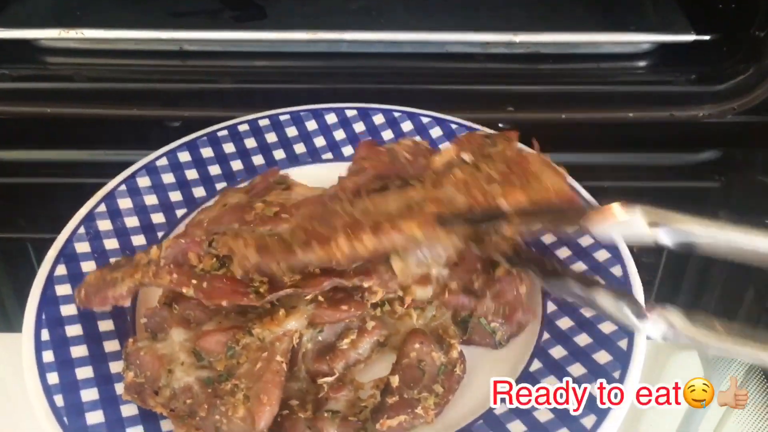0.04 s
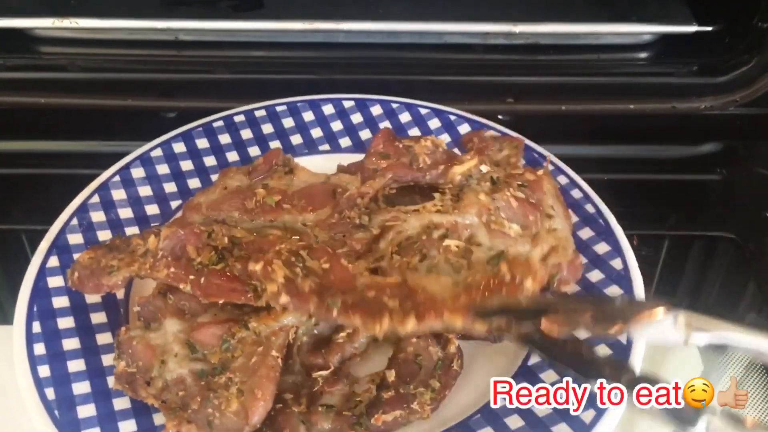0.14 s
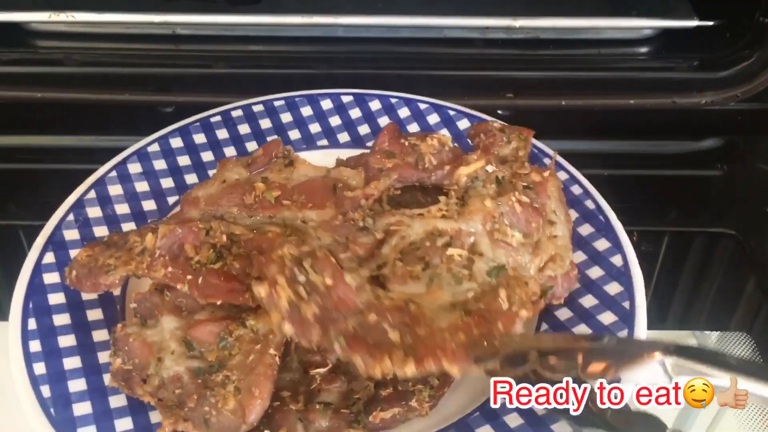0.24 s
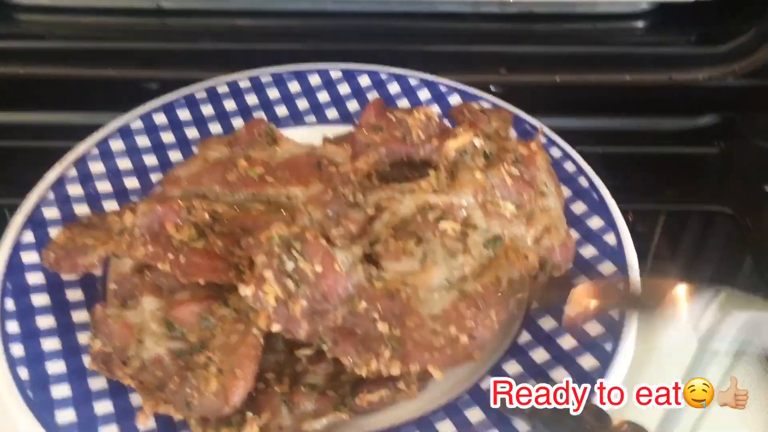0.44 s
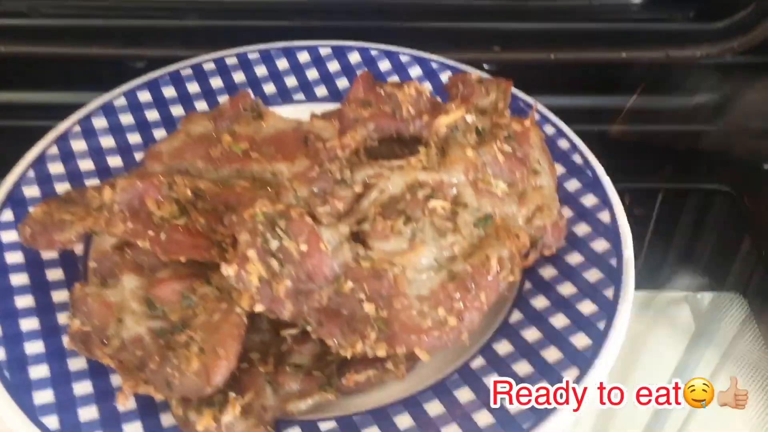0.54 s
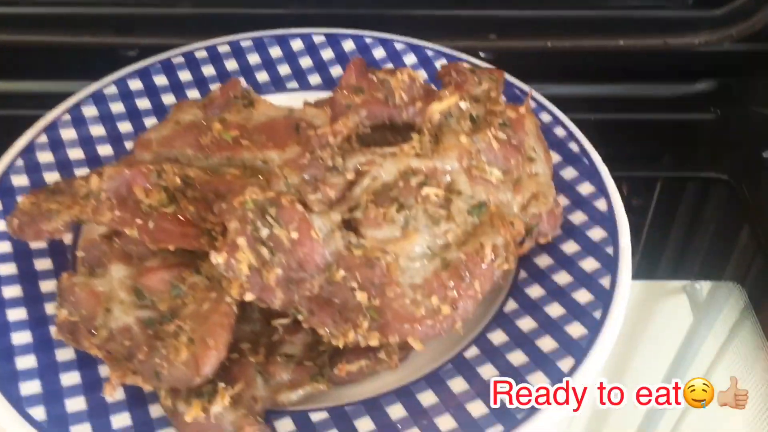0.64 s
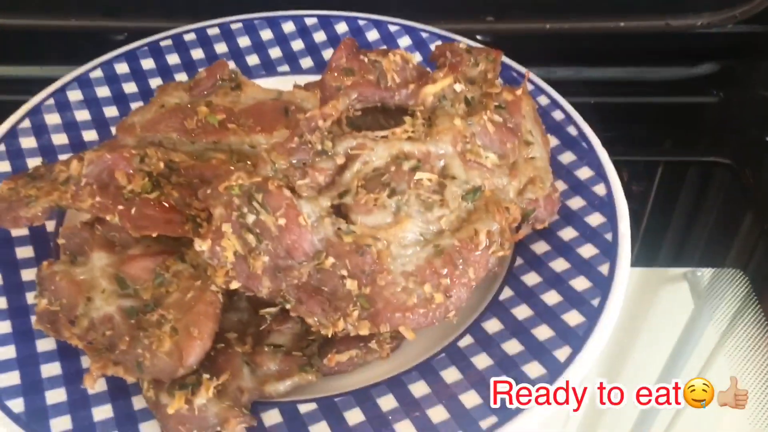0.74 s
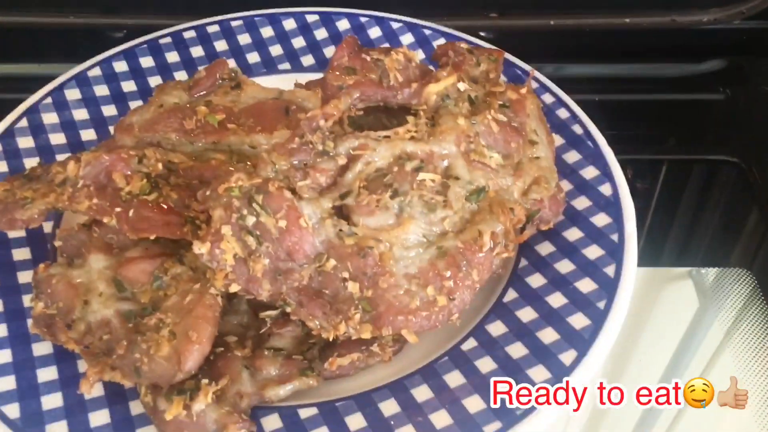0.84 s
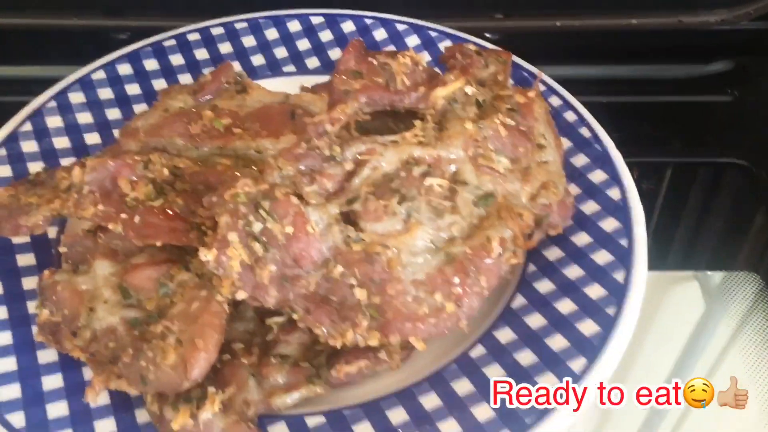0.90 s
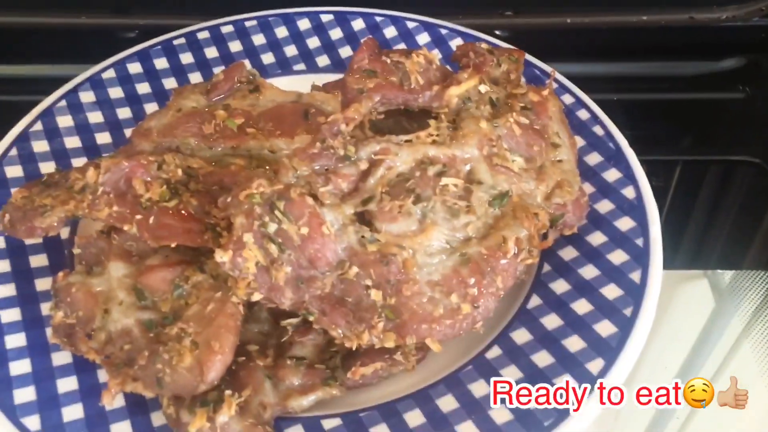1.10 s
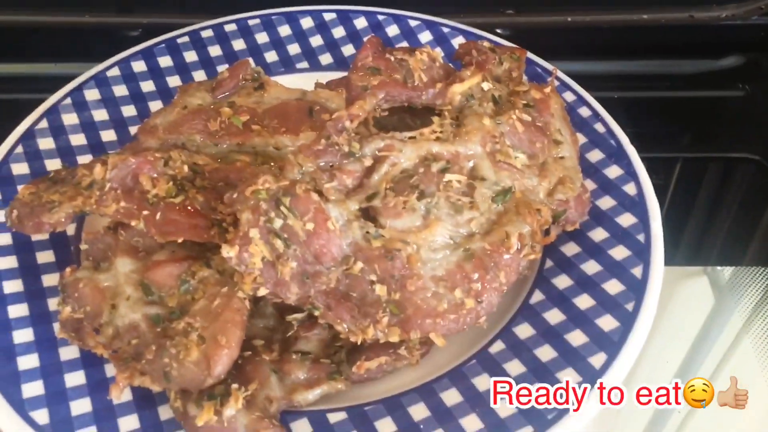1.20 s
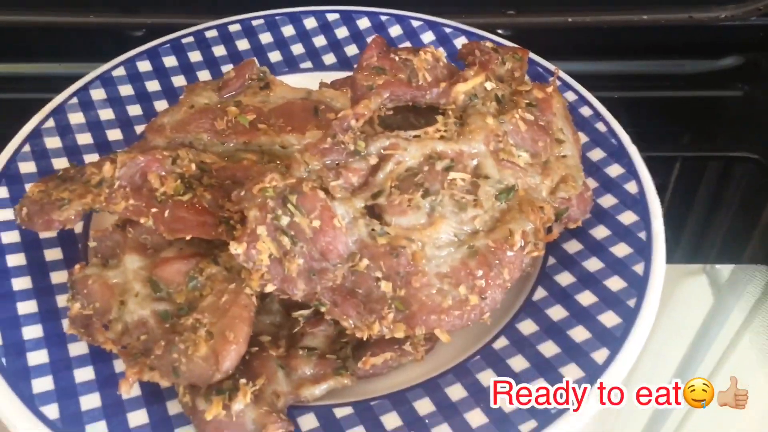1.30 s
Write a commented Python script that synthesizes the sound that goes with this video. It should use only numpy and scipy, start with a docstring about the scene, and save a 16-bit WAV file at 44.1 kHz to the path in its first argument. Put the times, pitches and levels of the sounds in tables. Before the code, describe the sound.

Metal tongs snap with two bright clacks, knock a plate, then tick faintly above a fan's rumble

```python
"""A fan rumbles and hums low throughout in a small kitchen, where steel tongs let go of meat on a china plate.
Their tips scrape, clack twice and rattle, and the plate is knocked; later come light ticks as they are drawn away.
The fan is shaped noise plus wavering tones; scrapes, rattles and ticks are shaped bursts of noise.
Tongs and plate also ring as sets of fading sines, and the kitchen adds a fading echo of noise."""
import sys
import numpy as np
from scipy import signal
from scipy.fft import irfft
from scipy.io import wavfile

SR = 44100
rng = np.random.default_rng(int(sys.argv[2]) if len(sys.argv) > 2 else 0)


def wav_out(sig):
    """Save sig, one row per channel (or a flat mono array), as 16-bit PCM at SR to the path in sys.argv[1]."""
    wavfile.write(sys.argv[1], SR, np.round(np.clip(np.atleast_2d(sig).T, -1, 1) * 32767).astype(np.int16))


N = 59535
T = np.arange(N) / SR  # the time of every sample, in seconds


def from_db(db):
    """Turn decibels into a gain."""
    return 10 ** (np.asarray(db) / 20)


def rms_one(x):
    """Scale a signal to an rms level of 1."""
    return x / np.sqrt(np.mean(x ** 2) + 1e-20)


def at_hz(points, hz):
    """Read a table between its points, with frequency on a log axis as we hear pitch."""
    f, value = np.transpose(points)
    return np.interp(np.log(np.maximum(hz, 1)), np.log(f), value)


def noise(spectrum, focus_hz=1, focus_db=0):
    """Coloured noise of rms 1: set levels with random phases, and an optional broad hump."""
    focus_width_hz = 900
    hz = np.arange(N // 2 + 1) * SR / N
    hump = np.exp(-.5 * ((hz - focus_hz) / focus_width_hz) ** 2)
    level = from_db(at_hz(spectrum, hz) + focus_db * hump)
    phases = np.exp(2j * np.pi * rng.random(len(hz)))
    return rms_one(irfft(level * phases, N))


def drift(rate_hz):
    """Smooth random wander of spread 1: white noise through two equal smoothers."""
    r = np.exp(-2 * np.pi * rate_hz / SR)
    white = rng.standard_normal(2 * N)
    smooth = signal.lfilter([1], [1, -2 * r, r * r], white)
    return rms_one(smooth[N:])  # drop the filter's start


def click(s):
    """A single click of height 1 at time s."""
    return (np.arange(N) == int(s * SR)) + 1e-18  # the tiny offset avoids vanishingly small numbers


def ring(clicks, hz, t60):
    """A resonance: each unit click starts a sine that falls 60 dB in t60 seconds."""
    r = from_db(-60 / (t60 * SR))
    w = 2 * np.pi * hz / SR
    return signal.lfilter([0, np.sin(w)], [1, -2 * r * np.cos(w), r * r], clicks)


def struck(modes, times, levels_db):
    """A solid body rings at its own pitches, each blow exciting them a little differently."""
    mode_spread_db = 2
    spread = mode_spread_db * rng.standard_normal((len(times), len(modes)))
    gains = from_db(levels_db[:, None] + spread)
    out = np.zeros(N)
    for k, (hz, db, t60) in enumerate(modes):
        clicks = np.zeros(N) + 1e-18
        clicks[(times * SR).astype(int)] = gains[:, k]
        sign = (-1) ** k  # neighbouring modes start in opposite directions
        out += sign * from_db(db) * ring(clicks, hz, t60)
    return out


def burst(s, db, t60):
    """Loudness shape of a contact's chatter: quick rise, grainy fall."""
    rise_s, grain_db, grain_hz = 0.00052, 2, 786
    age = np.maximum(T - s, 0)
    rise = 1 - np.exp(-age / rise_s)
    fall = from_db(-60 * age / t60)
    grain = rms_one(from_db(grain_db * drift(grain_hz)))
    return from_db(db) * rise * fall * grain


# Colour of the fan and room air: f/Hz, relative level/dB (per Hz)
FAN_COLOUR = [(25, -40.5), (38, -24), (52, -9), (72, -12), (102, -0.5), (135, 0), (165, -7.5), (240, -15),
              (310, -20), (470, -30.5), (800, -31), (1400, -36), (2200, -35.5), (3600, -46), (7500, -42.5),
              (9800, -43), (10300, -63), (10700, -77.5)]
# Motor tones before the rumble's swell: f/Hz, level/dB (rms)
MOTOR_TONES = [(100, -52.5), (119, -56), (191, -62), (237, -71), (301, -62), (394, -77), (797, -83),
               (1278, -79.5)]
# Level change of the deep rumble: t/s, level/dB
DEEP_SWELL = [(0.0, -1), (0.45, -1.5), (0.72, 0), (0.86, 3), (1.0, -1.5), (1.35, -0.5)]


def fan():
    """Air noise and motor tones of wavering strength and phase; the deep rumble swells a little."""
    air_db, rumble_top_hz = -47.5, 165.2
    waver_depth, waver_hz = 0.47, 6.8
    out = from_db(air_db) * noise(FAN_COLOUR)
    for hz, db in MOTOR_TONES:
        waver = 1 + waver_depth * (drift(waver_hz) + 1j * drift(waver_hz))
        turning = np.exp(2j * np.pi * (hz * T + rng.random()))
        out += from_db(db) * rms_one(np.real(waver * turning))
    low_pass = signal.butter(2, rumble_top_hz, fs=SR, output="sos")
    deep = signal.sosfiltfilt(low_pass, out)
    swell = from_db(np.interp(T, *np.transpose(DEEP_SWELL)))
    return out + deep * (swell - 1)


# Tips drag and slide off the meat: t/s, level/dB
SLIDE = [(0.0, -62.5), (0.07, -73.5), (0.165, -65), (0.186, -56.5), (0.199, -48.5), (0.213, -56)]
# Colour of steel tips rubbing and rattling, also used by tongs(): f/Hz, relative level/dB (per Hz)
TIP_COLOUR = [(200, -34), (380, -12), (520, -18), (700, -17.5), (1400, -26), (2200, -14.5), (3500, -9),
              (5000, -6.5), (6500, -2.5), (8500, -3.5), (9700, -9), (10200, -20), (10900, -40)]


def scrape():
    """The tips slide with an uneven grip, heard as grainy noise, until they snap together."""
    s, db = np.transpose(SLIDE)
    level = from_db(np.interp(T, s, db)) * (T < s[-1])
    grip = from_db(3 * drift(rate_hz=300))  # a spread of 3 dB
    return level * rms_one(grip * noise(TIP_COLOUR))


def tick(s, db, hz):
    """The hard first touch of steel: three resonances in a row give a bright pulse a few cycles long."""
    resonance_width_hz = 2160  # of each one alone
    t60 = np.log(1000) / (np.pi * resonance_width_hz)
    pulse = click(s)
    for _ in range(3):
        pulse = ring(pulse, hz, t60)
    return from_db(db) * pulse / np.abs(pulse).max()


# Contacts of the tips: t/s, tick level/dB, tick centre f/Hz, rattle level/dB, rattle t60/s,
# arms' ring level/dB
TIP_CONTACTS = [ (0.029, -57.5, 8200, -53.5, 0.041, -56), (0.1468, -46.5, 7800, -53.5, 0.023, -52),
                (0.1770, -37.5, 5600, -51.5, 0.038, -41), (0.2139, -7.5, 7624, -15.5, 0.03, -6),
                (0.2514, -33, 6840, -30, 0.019, -22), (0.2631, -12.5, 7680, -22.5, 0.088, -10),
                (0.2812, -30, 7380, -34, 0.054, -21), (0.3022, -22, 6040, -32, 0.027, -22),
                (0.344, -39, 6300, -40, .05, -27.5)]
# Ringing pitches of the steel arms: f/Hz, relative level/dB, t60/s (time to fall 60 dB)
ARM_MODES = [(349.4, -37.5, 0.142), (408.1, -29, .11), (448.8, -42.5, .16), (925, -45, .1),
             (1034, -35.5, 0.11), (2038, -37.5, 0.1), (2763, -34.5, 0.078), (2930, -42.5, 0.046),
             (3655, -32.5, 0.11), (3760, -39, 0.23), (4290, -32.5, .05), (6120, -32, .12), (6630, -26, .06),
             (6854, -38.5, .11), (7130, -22.5, 0.022), (7800, -30, .04), (7820, -32, 0.085),
             (8700, -13, 0.031), (9180, -28, 0.14), (9550, -16, 0.045)]


def tongs():
    """Every contact ticks, rattles as noise around the tick's pitch, and rings the arms."""
    times, *_, arms_db = np.transpose(TIP_CONTACTS)
    out = struck(ARM_MODES, times, arms_db)
    for s, tick_db, hz, rattle_db, t60, _ in TIP_CONTACTS:
        rattle = burst(s, rattle_db, t60) * noise(TIP_COLOUR, hz, focus_db=5)
        out += tick(s, tick_db, hz) + rattle
    return out


# The plate is knocked: t/s, relative level/dB
PLATE_KNOCKS = [(0.2835, -16), (0.3023, -9.5)]
# Ringing pitches of the loaded plate: f/Hz, relative level/dB, t60/s
CHINA_MODES = [(1358, -36.5, 0.053), (1398, -39, 0.11), (1565, -40.5, 0.023), (2013, -36, 0.091),
               (3350, -44.5, 0.12), (4280, -43, 0.11)]
# Colour of the rough contact noise: f/Hz, relative level/dB (per Hz)
CLANK_COLOUR = [(600, -38), (1100, -1), (1400, 2), (2000, 2), (2500, -8.5), (3300, 6.5), (5000, -12),
                (9000, -33)]


def plate():
    """A short noisy clank and ringing china, damped by the meat."""
    clank_db, clank_t60_s = -36.5, 0.085  # the level is added to each knock's
    shape = sum(burst(s, db + clank_db, clank_t60_s) for s, db in PLATE_KNOCKS)
    clank = shape * noise(CLANK_COLOUR)
    return clank + struck(CHINA_MODES, *np.transpose(PLATE_KNOCKS))


# The hinge ticks as the tongs are drawn away: t/s, level/dB, t60/s
HINGE_SLIPS = [(0.613, -57, 0.033), (1.06, -59.5, 0.048), (1.0910, -55.5, 0.029), (1.2469, -47, 0.031),
               (1.2589, -45.5, 0.06)]
# Colour of the hinge: f/Hz, relative level/dB (per Hz)
HINGE_COLOUR = [(1500, -35), (2400, -17.5), (2850, -3.5), (3400, -10), (4400, -6.5), (5100, -8),
                (5900, 3.5), (6700, -2), (7400, -9), (8200, -2.5), (9700, -8.5), (10500, -41)]


def hinge():
    """Small dry slips of steel on steel, made as short bursts of noise."""
    return sum(burst(*row) for row in HINGE_SLIPS) * noise(HINGE_COLOUR)


# How long the room's echo takes to fall 60 dB: f/Hz, t60/s
ECHO_T60 = [(300, .6), (1200, 0.38), (4000, 0.49), (9000, 0.38)]
# Reverberation against the direct sound: f/Hz, level/dB
ECHO_LEVEL = [(300, -0.5), (1200, -3.5), (4000, -8), (9000, -15.5)]


def kitchen(x):
    """Echo scattered from all sides: fading noise, each octave with its own level and decay."""
    delay_s = 0.0039
    edges = np.geomspace(180, 11520, 7)  # octave borders in Hz
    response = np.zeros(N)
    for low, high in zip(edges, edges[1:]):
        hz = np.sqrt(low * high)
        fall = from_db(-60 * T / at_hz(ECHO_T60, hz)) * (T > delay_s)
        tail = rms_one(rng.standard_normal(N) * fall) / np.sqrt(N)  # total energy 1
        octave = signal.butter(2, [low, high], "band", fs=SR, output="sos")
        response += from_db(at_hz(ECHO_LEVEL, hz)) * signal.sosfilt(octave, tail)
    return signal.fftconvolve(x, response)[:N]


def scene():
    """Tongs and plate, direct and echoed by the kitchen, over the fan."""
    air = fan()
    near = tongs() + plate() + hinge() + scrape()
    return (near + kitchen(near) + air)[None]


def record(dry):
    """A steep low-pass filter cuts the top of the treble."""
    cutoff_hz = 10900
    taps = signal.firwin(255, cutoff_hz, window=("kaiser", 7), fs=SR)
    return signal.fftconvolve(dry, taps[None], mode="same")


dry = scene()
out = record(dry)
wav_out(out)
```